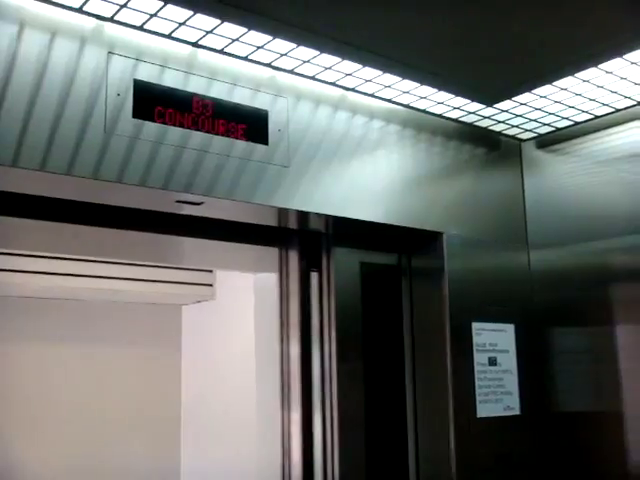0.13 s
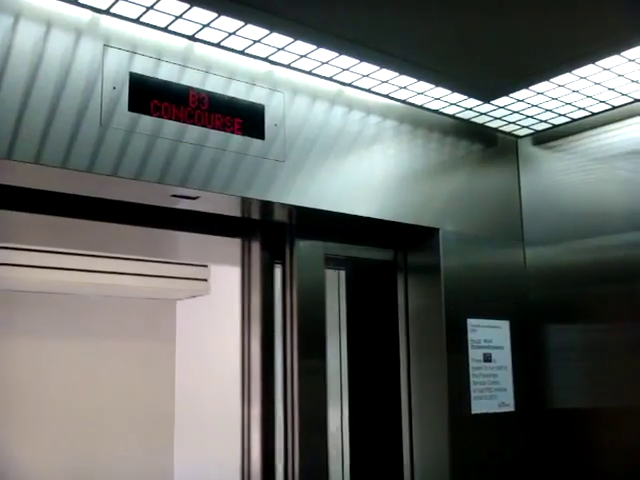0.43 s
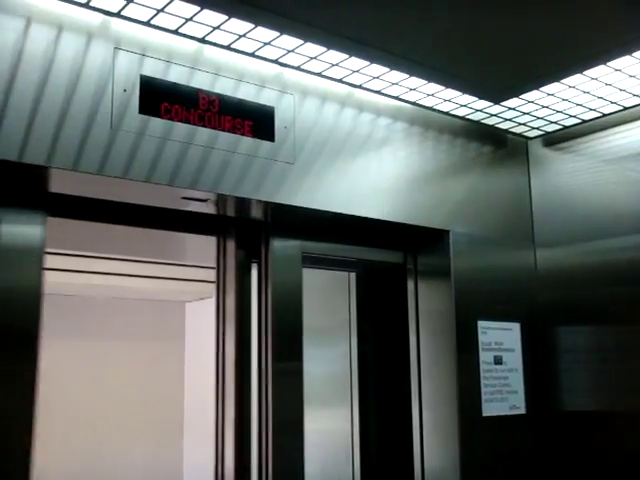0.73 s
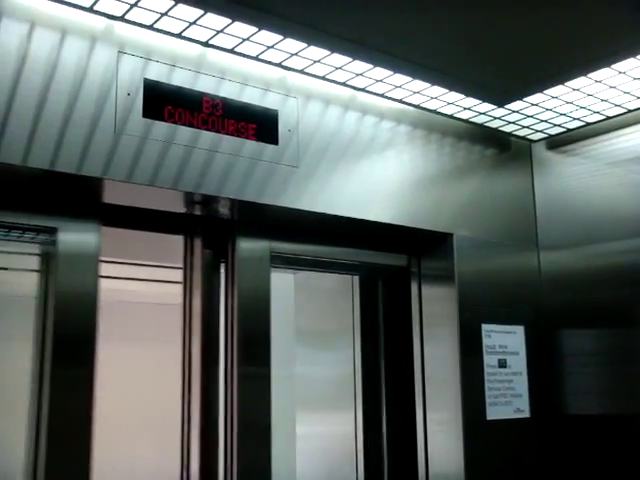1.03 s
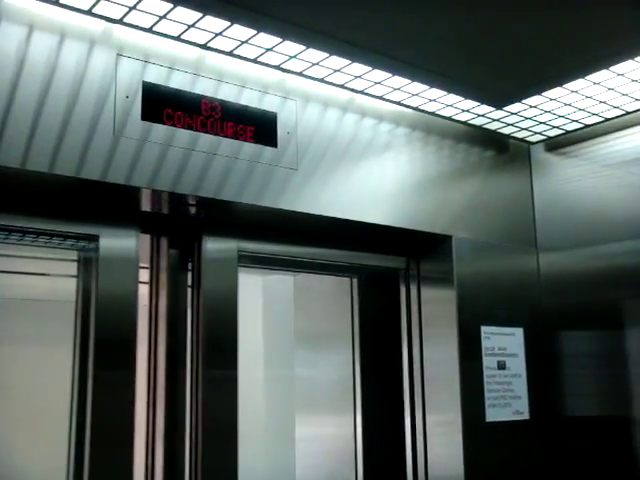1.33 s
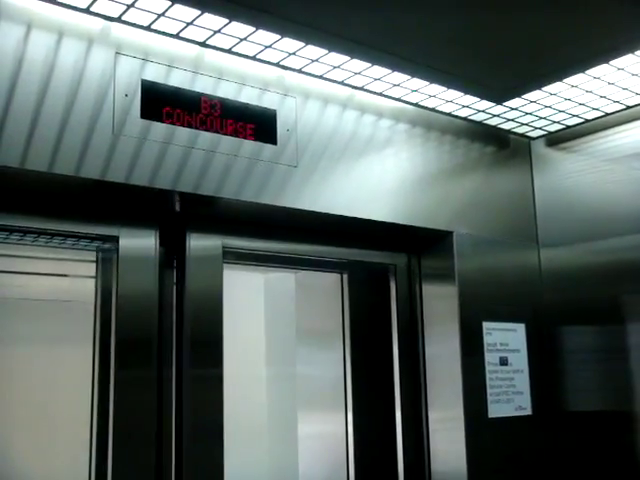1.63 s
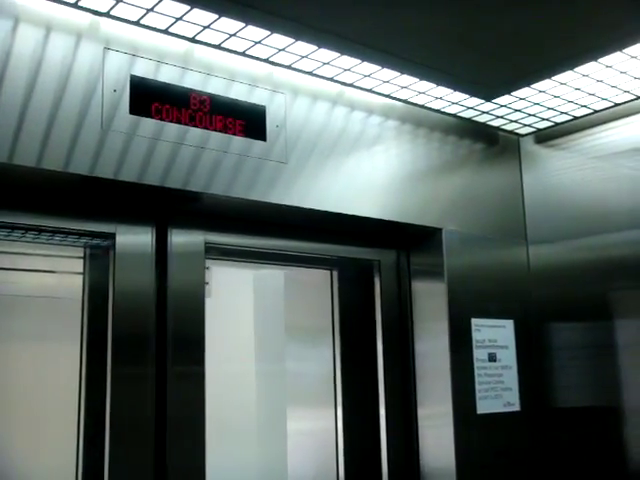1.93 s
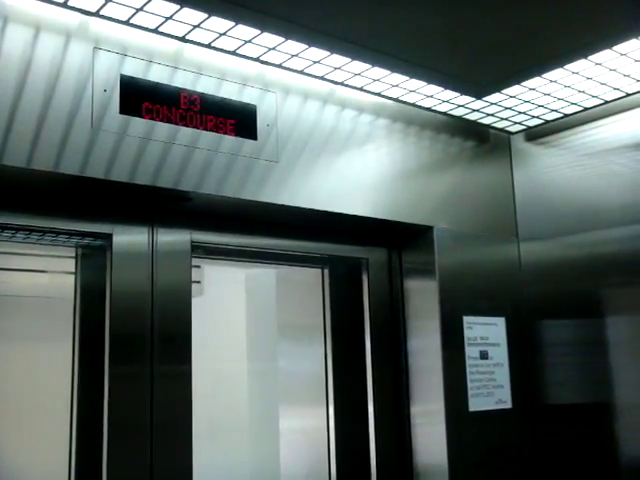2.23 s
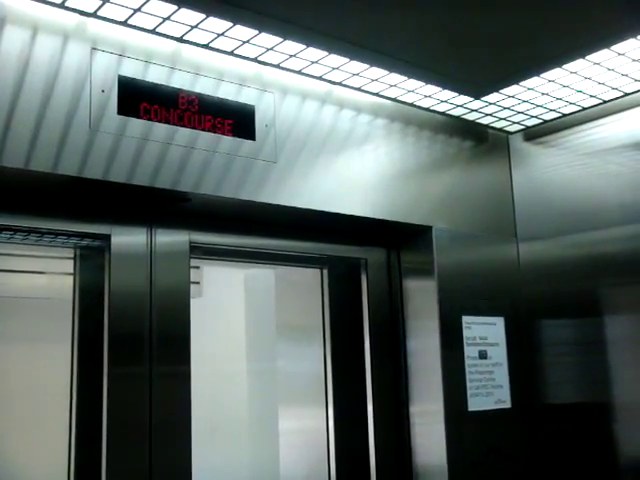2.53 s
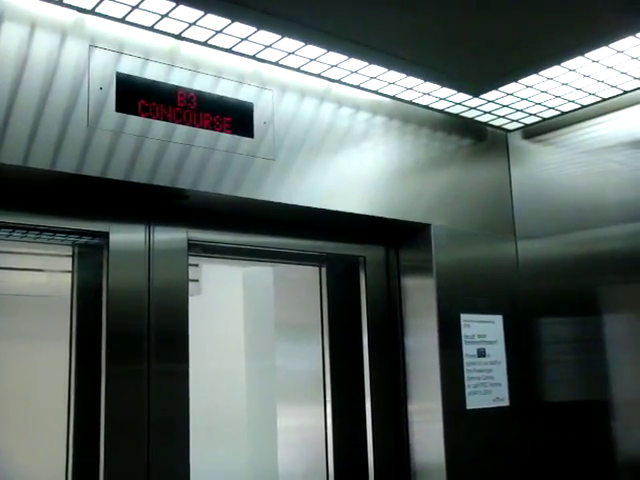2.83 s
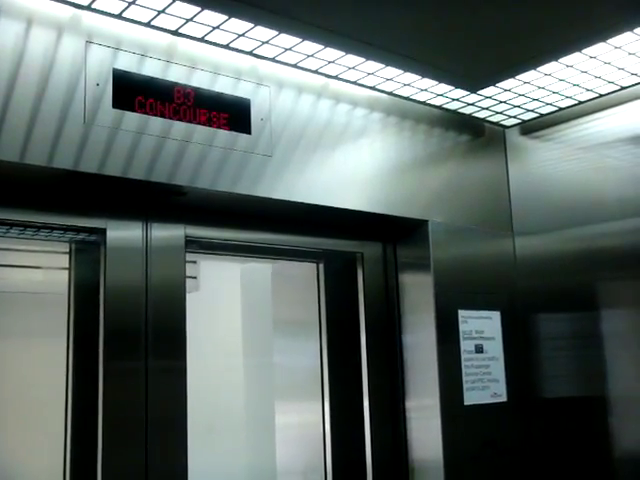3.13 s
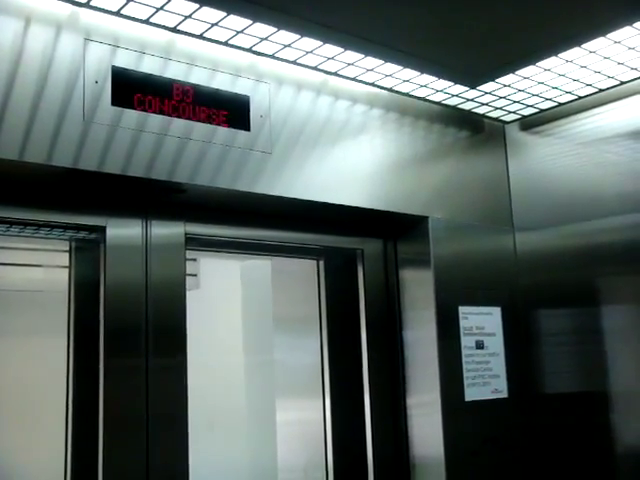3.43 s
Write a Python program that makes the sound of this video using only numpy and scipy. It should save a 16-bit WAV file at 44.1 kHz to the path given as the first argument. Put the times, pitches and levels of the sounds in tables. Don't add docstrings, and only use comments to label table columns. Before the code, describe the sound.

Elevator doors bump along, meet with a hard ringing clank, then latch over steady fan rush

```python
import sys
import numpy as np
from scipy import signal
from scipy.io import wavfile

SR = 44100
rng = np.random.default_rng(int(sys.argv[2]) if len(sys.argv) > 2 else 0)


def rack_gain(trim_db):
    fader = np.asarray(trim_db, float)
    return 10 ** (fader / 20)


def wav_out(sig):
    wavfile.write(sys.argv[1], SR, np.round(np.clip(np.atleast_2d(sig).T, -1, 1) * 32767).astype(np.int16))


N = 157437


def rms_one(x):
    return x / np.sqrt(np.mean(x ** 2) + 1e-20)


def in_time(rows):
    return np.interp(np.arange(N) / SR, *np.transpose(rows))


def at_hz(points, hz):
    table_hz, value = np.transpose(points)
    return np.interp(np.log(hz), np.log(table_hz), value)


def drift(rate_hz, size):
    hop = 40
    settle = 2000
    r = np.exp(-2 * np.pi * hop * rate_hz / SR)
    white = rng.standard_normal(size // hop + settle + 2)
    slow = signal.lfilter([1], [1, -2 * r, r * r], white)[settle:]
    return np.interp(np.arange(size) / hop, np.arange(len(slow)), rms_one(slow))


def resonate(x, hz, width_hz):
    r = np.exp(-np.pi * width_hz / SR)
    pole_pair = [1, -2 * r * np.cos(2 * np.pi * hz / SR), r * r]
    return signal.lfilter([(1 - r * r) / 2, 0, (r * r - 1) / 2], pole_pair, x)


def resonate_twice(x, hz, width_hz):
    return rms_one(resonate(resonate(x, hz, width_hz), hz, width_hz))


def bands(spectrum, size, shape=lambda hz: 1):
    low_hz, top_hz, settle = spectrum[0][0], 12000, 4000
    edges = np.geomspace(low_hz, top_hz, 2 + int(3 * np.log2(top_hz / low_hz)))
    white = rng.standard_normal((2, size + settle))
    total = 0
    for k, (a, b) in enumerate(zip(edges, edges[1:])):
        centre_hz = np.sqrt(a * b)
        band_pass = signal.butter(2, [a, b], "band", fs=SR, output="sos")
        band = signal.sosfilt(band_pass, white[k % 2])[settle:]
        total = total + rack_gain(at_hz(spectrum, centre_hz)) * shape(centre_hz) * band
    return total


# f/Hz, t60/s
CAR_T60 = [(300, 0.97), (1000, 0.82), (2000, 0.7), (4000, 0.93), (7000, 0.66), (10000, 0.47)]


def dying(hz, attack_s, crack_db=0., stretch=1.):
    t = np.arange(SR) / SR
    decay = rack_gain(-60 * t / (stretch * at_hz(CAR_T60, hz)))
    crack = (rack_gain(crack_db) - 1) * np.exp(-t / 0.0071)
    return (1 - np.exp(-t / attack_s)) * (decay + crack)


def place(rows, rings):
    out = np.zeros(N + SR)
    for (s, db, *_), ring in zip(rows, rings):
        start = int(s * SR)
        out[start:start + SR] += rack_gain(db) * ring
    return out[:N]


def blow(colour, rings, ring_db, attack_s, crack_db, stretch):
    drive = rms_one(bands(colour, SR))
    wash = bands(colour, SR, lambda hz: dying(hz, attack_s, crack_db, stretch))
    wash = wash / np.std(bands(colour, SR // 4))
    out = rack_gain(2.1 * drift(120, SR)) * wash
    for hz, width_hz, db in rings:
        envelope = dying(hz, attack_s, crack_db, 0.72 * stretch)
        out = out + rack_gain(db + ring_db) * envelope * rms_one(resonate(drive, hz, width_hz))
    return out


def contact(rows, *body, **settings):
    return place(rows, [blow(*body, **settings) for _ in rows])


# t/s, level/dB
CLANKS = [
    (1.663, -12.5),
    (1.677, -22),
    (1.699, -23),
    (1.711, -40),
]
# f/Hz, level/dB per Hz
CLANK_COLOUR = [(300, -42), (650, -7.5), (1000, -7), (1660, 0.5), (3200, -10.5), (4300, -13.5), (6000, -17),
                (9600, -31.5)]
# f/Hz, width/Hz, level/dB
CLANK_RINGS = [ (900, 220, -4), (1580, 120, -3.5), (2880, 900, -1.5), (1970, 30, -10), (2360, 50, -24),
               (2740, 79, -6.5), (3200, 160, -2), (3590, 110, -8)]


def clank():
    return contact(CLANKS, CLANK_COLOUR, CLANK_RINGS,
                   ring_db=-8.5, attack_s=0.00086, crack_db=6, stretch=0.97)


# t/s, level/dB
LATCH = [
    (2.187, -18),
    (2.199, -21),
    (2.235, -30),
]
# f/Hz, level/dB per Hz
LATCH_COLOUR = [(300, -16), (500, -5.5), (1100, -9), (2190, -3), (3600, -10.5), (6150, -14.5), (9600, -26)]
# f/Hz, width/Hz, level/dB
LATCH_RINGS = [ (1020, 210, 5.5), (1410, 50, -11), (1880, 95, -3), (2180, 40, -6), (3060, 220, -2),
               (3460, 200, 0), (6500, 310, 1)]


def latch():
    return contact(LATCH, LATCH_COLOUR, LATCH_RINGS,
                   ring_db=-12.5, attack_s=0.0015, crack_db=6.5, stretch=0.85)


# t/s, level/dB
BUMP = [
    (1.215, -22.5),
    (1.272, -22),
    (1.292, -29.5),
    (1.33, -32),
]
# f/Hz, level/dB per Hz
BUMP_COLOUR = [(180, -36), (300, -5), (600, -3), (1230, -1.5), (3000, -11), (5000, -12.5), (9600, -30)]
# f/Hz, width/Hz, level/dB
BUMP_RINGS = [ (897, 18, -2.5), (1014, 60, -16), (1660, 41, 2), (2240, 230, 2.5), (2800, 120, -6)]


def bump():
    return contact(BUMP, BUMP_COLOUR, BUMP_RINGS,
                   ring_db=-7.5, attack_s=0.0043, crack_db=1.0, stretch=0.8)


def groan():
    start_s, level_db = 1.803, -20.5
    from_hz, to_hz, sag_s = 370, 323.4, 0.0302
    hold_s, t60_s = .17, 0.79
    t = np.arange(SR) / SR
    hz = to_hz + (from_hz - to_hz) * np.exp(-t / sag_s)
    fade_db = -15 * t - 60 * np.maximum(t - hold_s, 0) / t60_s
    shape = (1 - np.exp(-t / 0.0026)) * rack_gain(fade_db + 1.7 * drift(27, SR))
    phase = np.cumsum(2 * np.pi * hz * (1 + .015 * drift(13, SR)) / SR)
    return place([(start_s, level_db)], [shape * np.sin(phase)])


# t/s, level/dB, f/Hz, t60/s
THUDS = [(1.274, -19, 363, 0.17), (1.712, -17.5, 395, 0.18), (1.807, -24, 433, 0.17), (1.85, -15, 376, .2),
         (1.878, -21.5, 487, 0.35), (1.92, -23, 353, 0.57), (2.19, -18, 420, .15), (.69, -27.5, 515, 0.34),
         (.33, -26.5, 511, .4), (1.6641, -4, 1675, 0.04), (1.682, -13, 1593, 0.15),
         (1.698, -17, 1770, 0.039), (2.025, -23, 546, 0.41), (2.21, -22.5, 405, 0.37),
         (2.443, -21.5, 722, 0.078), (2.455, -18.5, 428, 0.13), (.165, -18.5, 507.5, 0.24)]


def thuds():
    t = np.arange(SR) / SR
    rings = []
    for _, _, hz, t60_s in THUDS:
        envelope = (1 - np.exp(-t * hz / 1.6)) * rack_gain(-60 * t / t60_s)
        modes = np.sin(2 * np.pi * hz * t) + 0.47 * np.sin(2 * np.pi * 1.13 * hz * t)
        rough = 0.58 * rms_one(resonate(rng.standard_normal(SR), hz, 140))
        rings.append(envelope * (modes + rough))
    return place(THUDS, rings)


# t/s, level/dB, f/Hz, width/Hz
TICKS = [(1.194, -29, 5140, 900), (1.196, -27, 6340, 714), (1.203, -29, 7650, 550),
         (1.198, -34.5, 8700, 2520), (1.259, -30, 8400, 2520), (1.262, -36, 6600, 1200),
         (1.51, -45, 9100, 1500), (1.765, -31.5, 8850, 1600), (1.77, -32.5, 5770, 3500),
         (2.13, -40, 8000, 1490), (2.135, -35, 5800, 3020)]


def ticks():
    rings = []
    for _, _, hz, width_hz in TICKS:
        tick = resonate_twice(rng.standard_normal(SR), hz, width_hz)
        rings.append(dying(hz, 0.0016, stretch=0.96) * tick)
    return place(TICKS, rings)


# t/s, level/dB
RUMBLE = [
    (0, -36),
    (.9, -37),
    (1.1, -44.5),
    (1.7, -56),
    (2.3, -46),
    (2.38, -31.5),
    (2.6, -52),
    (3.6, -55),
]


def rumble():
    hz = 29.1 * (1 + .07 * drift(2.84, N))
    phase = np.cumsum(2 * np.pi * hz / SR)
    return rack_gain(in_time(RUMBLE) + 6 + 1.5 * drift(4, N)) * np.sin(phase)


def air(spectrum, tones):
    out = rms_one(bands(spectrum, N))
    for hz, width_hz, db in tones:
        swell = rack_gain(db + 1.12 * drift(3.9, N))
        out = out + swell * resonate_twice(rng.standard_normal(N), hz, width_hz)
    return out


# t/s, level/dB
GAP = [
    (0, -23.5),
    (.5, -25),
    (1.1, -27.5),
    (1.6, -32.5),
    (2.1, -36),
    (2.5, -41.5),
    (3.6, -39.5),
]
# f/Hz, level/dB per Hz
HALL = [(90, -34), (150, -7), (270, -31), (500, -13.5), (1000, -7), (2010, -11.5), (5440, -21),
        (9600, -37.5)]
# f/Hz, width/Hz, level/dB
HALL_TONES = [(511.8, 28, -8.5), (558.6, 26, -19), (1043, 84, -9.5), (941, 23, -19.5), (1970, 80, -17.5),
              (5280, 390, -18), (122.4, 32, -16.5)]


def hall():
    return rack_gain(in_time(GAP)) * air(HALL, HALL_TONES)


# f/Hz, level/dB per Hz
FAN = [(26, -4), (50, -5), (150, -8.5), (260, -9.5), (554, -4), (1100, -12.5), (1250, -11.5), (9600, -41)]
# f/Hz, width/Hz, level/dB
FAN_TONES = [(112.6, 48, -8), (495.6, 16, -25.5), (550, 21.6, -12), (984.3, 27, -12), (1080, 82, -14),
             (176, 12, -17), (247, 15, -21.5), (405, 24, -19), (741, 59, -14), (2920, 1200, -18),
             (70, 14, -15)]


def fan():
    level_db = -28.5
    return rack_gain(level_db) * air(FAN, FAN_TONES)


def scene():
    doors = clank() + latch() + bump() + groan() + thuds() + ticks()
    return (doors + rumble() + hall() + fan())[None]


def band_limit(x):
    return signal.sosfilt(signal.butter(12, 11110, fs=SR, output="sos"), x)


# t/s, length/s, above f/Hz
STARVED = [
    (2.17, 0.012, 3000),
    (3.4, 0.02, 5300),
    (1.63, 0.0093, 9500),
    (0.5, 0.014, 9200),
]


def record(dry):
    start_s, ceiling, top_hz = .0425, 1.05, 10030
    t = np.arange(N) / SR
    x = np.clip((t - start_s) / .001, 0, 1) * ceiling * np.tanh(dry / ceiling)
    for s, length_s, hz in STARVED:
        dull = signal.sosfiltfilt(signal.butter(4, hz, fs=SR, output="sos"), x)
        window = np.clip(np.minimum(t - s, s + length_s - t) / .002, 0, 1)
        x = x + .95 * window * (dull - x)
    x = signal.sosfilt(signal.ellip(12, .5, 55, top_hz, fs=SR, output="sos"), x)
    return band_limit(x)


dry = scene()
out = record(dry)
wav_out(out)
```